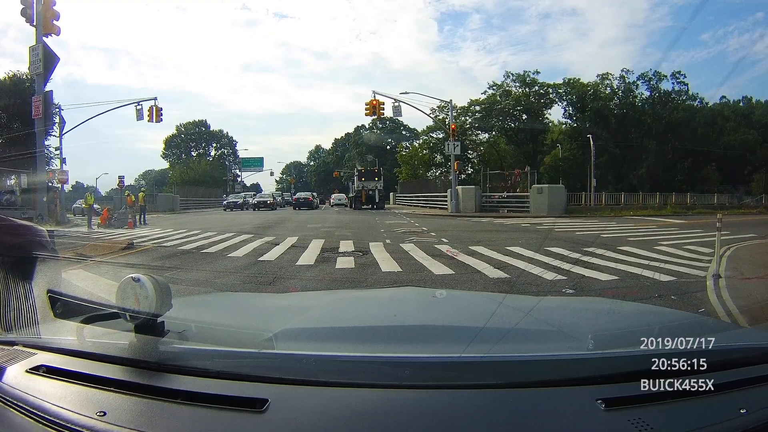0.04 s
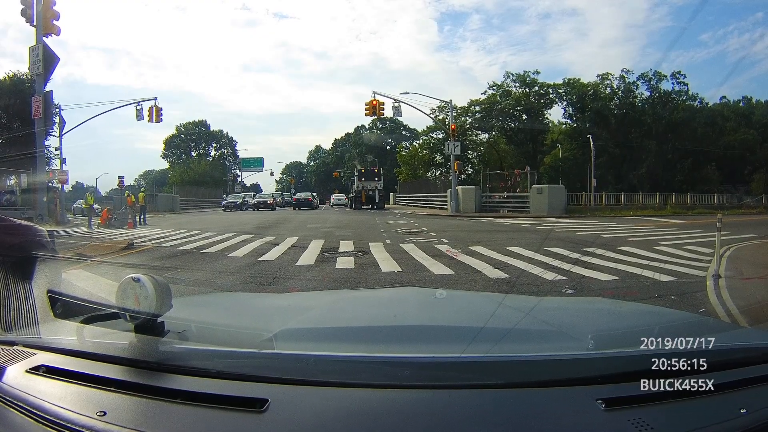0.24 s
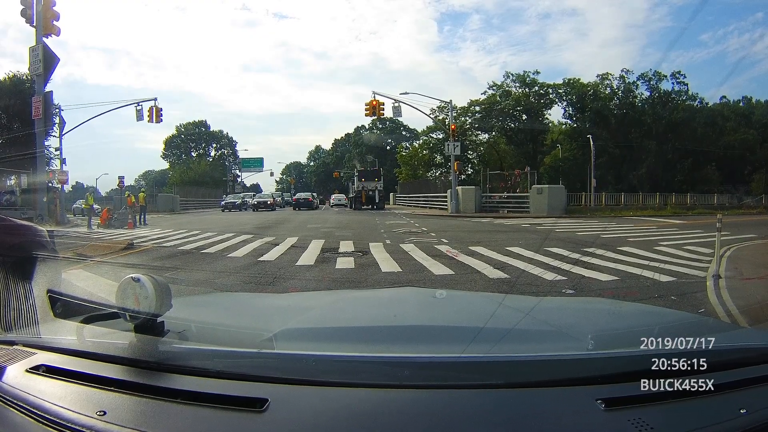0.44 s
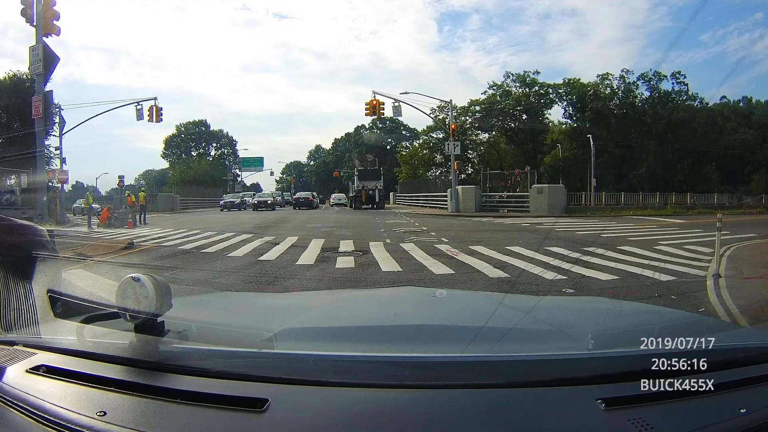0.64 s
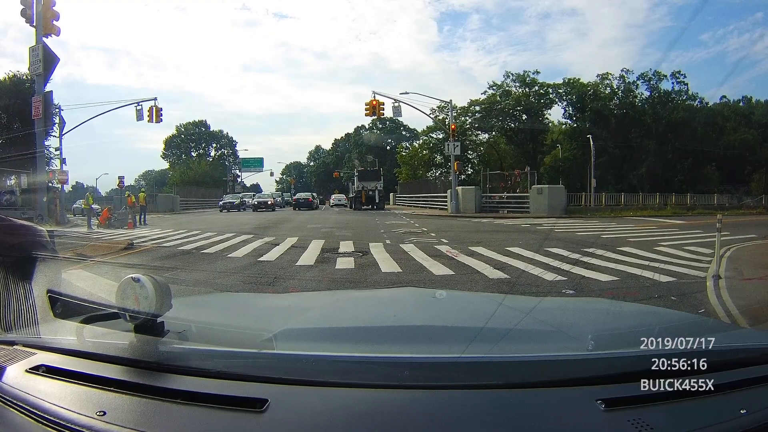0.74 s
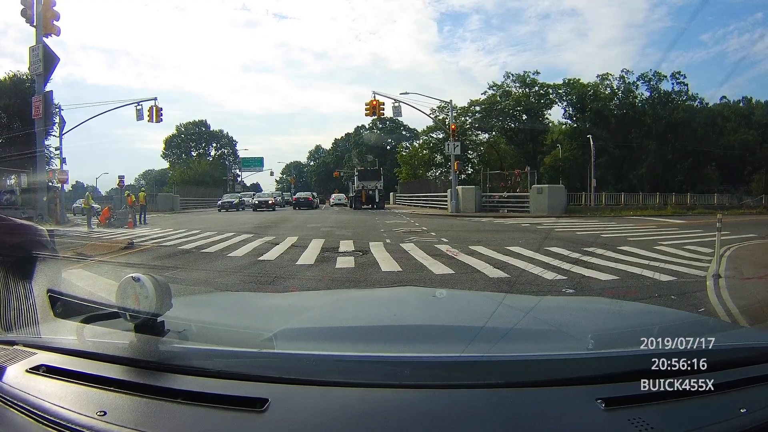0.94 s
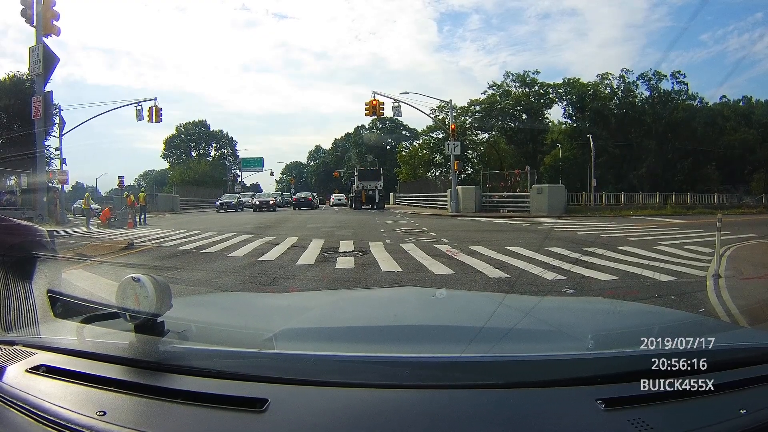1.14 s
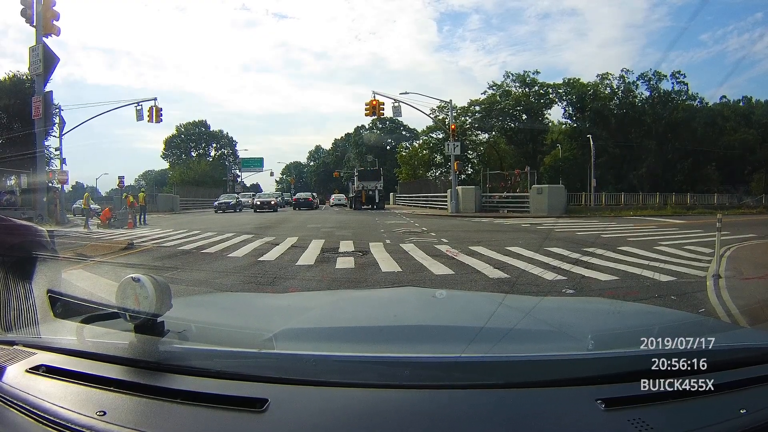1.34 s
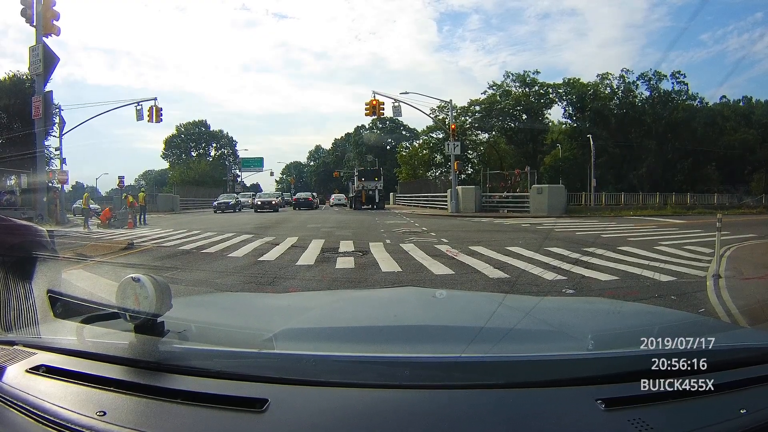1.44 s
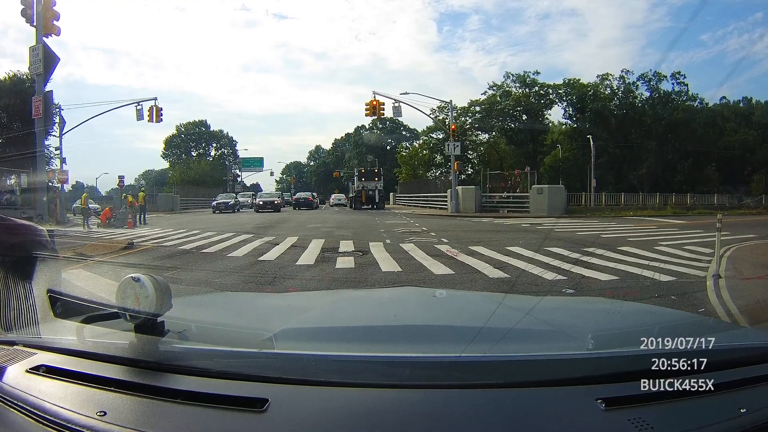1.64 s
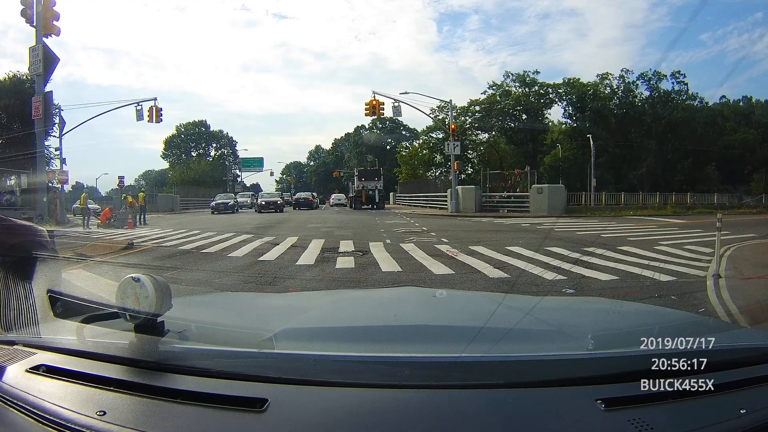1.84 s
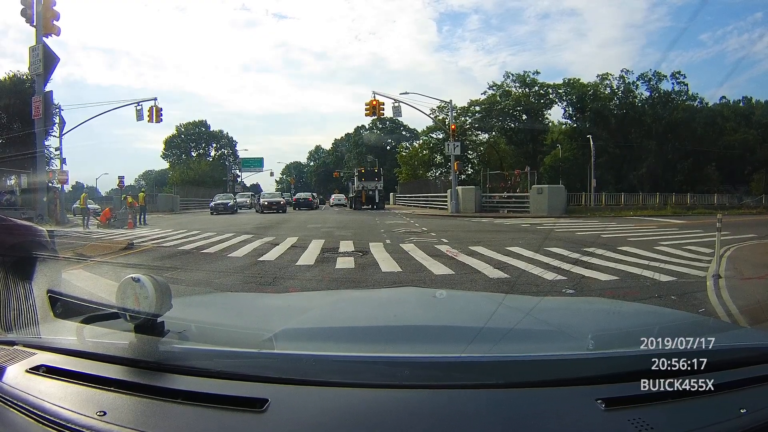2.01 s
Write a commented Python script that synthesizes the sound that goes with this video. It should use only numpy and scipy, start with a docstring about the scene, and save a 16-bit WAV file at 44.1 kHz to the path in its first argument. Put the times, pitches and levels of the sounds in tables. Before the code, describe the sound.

A big V8 engine idles from 0 to about 2.1 seconds, heard in mono inside a stationary car. A deep boom dominates, pulsing unevenly and wavering in pitch several times a second. The idle sags slightly around 0.55, recovers by 1.15 and dips again near 1.6. Muffled thuds swell near 1.2 and 1.85; soft knocks, fan air, grainy hiss, faint trim buzz and thin whines stay underneath.

```python
"""A big V8 idles with an uneven lope, heard from inside the cabin: a bending exhaust boom leads.
The cylinders of the two banks fire with uneven strength, so mostly odd multiples of the engine cycle drone.
Firing pulses thud through pipe and cabin resonances; decaying puffs of noise ring the engine as clatter.
Shaped noise makes the fan and a hiss that swells with each revolution; narrow bands of noise make loose
trim buzz, rattle and sizzle, and swell briefly at set pitches; faint whines from sine waves lie on top."""
import sys
import numpy as np
from scipy import signal
from scipy.fft import rfft, irfft
from scipy.io import wavfile
from scipy.ndimage import uniform_filter1d

SR = 44100
rng = np.random.default_rng(int(sys.argv[2]) if len(sys.argv) > 2 else 0)


def store_wav(level_fs):
    """Save 16-bit WAV to argv[1]."""
    pcm = np.round(np.clip(np.atleast_2d(level_fs), -1, 1) * 32767)
    wavfile.write(sys.argv[1], SR, pcm.T.astype(np.int16))


N = 91463
TIME = np.arange(N) / SR


def amp(db):
    """Decibels to gain."""
    return 10 ** (np.asarray(db) / 20)


def unit(x):
    """Scales to rms 1."""
    return x / np.sqrt(np.mean(x ** 2) + 1e-20)


def sine(hz):
    """A sine of peak 1 that follows a frequency curve."""
    return np.sin(2 * np.pi * np.cumsum(hz) / SR)


def drift(hz):
    """Random wander of rms 1, with little movement faster than hz times a second."""
    f = np.fft.rfftfreq(2 * N, 1 / SR)
    spectrum = rfft(rng.standard_normal(2 * N)) / (1 + (f / hz) ** 8)
    return unit(irfft(spectrum)[:N])


def noise(points, low_hz):
    """Noise of a given spectrum and rms 1, cut steeply below low_hz."""
    f = np.fft.rfftfreq(N, 1 / SR) + 1  # the offset keeps the logarithm finite
    hz, db = np.transpose(points)
    gain = amp(np.interp(np.log(f), np.log(hz), db))
    gain = gain / np.sqrt(1 + (low_hz / f) ** 8)
    return unit(irfft(rfft(rng.standard_normal(N)) * gain, N))


def ring(x, modes):
    """Passes x through parallel resonances, each filtered twice for steep sides, to rms 1."""
    out = np.zeros(N)
    for hz, half_width_hz, db in modes:
        b, a = signal.iirpeak(hz, hz / (2 * half_width_hz), SR)
        once = signal.lfilter(b, a, x)
        out += amp(db) * unit(signal.lfilter(b, a, once))
    return unit(out)


def beats(turns):
    """Samples at which a new whole turn begins."""
    return np.flatnonzero(np.diff(np.floor(turns), prepend=-1))


def burst(start, rise_s):
    """An envelope that peaks at 1, rise_s after its start, and dies away."""
    u = np.maximum(TIME - start, 0) / rise_s
    return u * np.exp(1 - u)


# Idle speed of the crankshaft. Each row: time in seconds, speed in rpm.
IDLE_SPEED = [(0, 535), (.3, 530), (.55, 485), (.85, 500), (1.15, 545), (1.35, 535), (1.6, 505), (1.9, 535),
              (2.07, 540)]
LOPE_LAG_TURNS = 0.14


def crankshaft():
    """Integrates idle speed into four-stroke cycles (two turns each) and a lope of one swing a turn."""
    rpm = np.interp(TIME, *np.transpose(IDLE_SPEED))
    revolutions = np.cumsum(rpm) / 60 / SR
    lope = np.cos(2 * np.pi * (revolutions - LOPE_LAG_TURNS))
    return revolutions / 2, lope


# Swells and bends of the exhaust boom, joined up and then smoothed.
# Each row: time in seconds, rms level in dB, pitch in Hz.
BOOM_PATH = [(0, -21.5, 74.2), (0.115, -16.5, 87.3), (0.184, -21, 81.55), (0.261, -12.5, 82.8),
             (0.303, -23, 79.76), (0.382, -19.5, 73.9), (0.478, -11.5, 86), (0.552, -23, 71.64),
             (0.609, -12.5, 80.05), (0.662, -25, 84.3), (0.695, -15.5, 78.8), (0.725, -30.5, 90.7),
             (0.758, -12.0, 77.28), (0.895, -16, 82.55), (0.957, -18, 67.7), (0.977, -12, 79.95),
             (1.056, -19.5, 77.5), (1.082, -23.5, 55.1), (1.11, -13.5, 85.6), (1.267, -39, 86.73),
             (1.3, -11.5, 82.55), (1.387, -15, 80.54), (1.411, -34.5, 59.43), (1.444, -11.0, 80.34),
             (1.485, -34.5, 92.1), (1.526, -15.5, 83.2), (1.617, -20.5, 72.03), (1.657, -13.0, 76.12),
             (1.705, -41.5, 72.16), (1.729, -13.5, 82.56), (1.753, -38.5, 92.8), (1.789, -12.0, 76.8),
             (1.817, -21, 92), (1.86, -14.5, 82.4), (1.935, -56.5, 86.96), (1.985, -12, 80.66),
             (2.02, -10.5, 79.5), (2.07, -38.5, 85.2)]
BOOM_GLIDE_S = .008


def boom():
    """The exhaust tone on the cabin resonance: its loudness and its pitch, sample by sample."""
    s, db, hz = np.transpose(BOOM_PATH)
    path = np.array([np.interp(TIME, s, amp(db)), np.interp(TIME, s, hz)])
    return uniform_filter1d(path, round(BOOM_GLIDE_S * SR))


# Deep exhaust tones. Each row: multiple of the four-stroke cycle, rms level in dB before wander and lope.
DRONE_TONES = [(9, -54), (11, -26.5), (13, -48.5), (25, -44.5), (32, -47), (39, -50.5), (70, -57)]
# Spectrum of the body shake under the tones. Each row: frequency in Hz, relative level in dB per Hz.
RUMBLE_SPECTRUM = [(28, 0), (40, 0), (70, -2), (110, -6), (200, -24), (600, -60)]
RUMBLE_DB, DRONE_LOPE_DB = -36.5, 4  # rumble level before the lope; lope swing either way


def exhaust(cycles, boom_gain, boom_hz, lope):
    """A clean, bending boom over cycle-locked deep tones and rumble that throb once a revolution."""
    drone = np.zeros(N)
    for order, db in DRONE_TONES:
        level = amp(db + .7 * drift(4))
        drone += level * np.cos(2 * np.pi * (order * cycles + .03 * drift(4)))
    rumble = amp(RUMBLE_DB) * noise(RUMBLE_SPECTRUM, 26)
    throb = (np.sqrt(2) * drone + rumble) * amp(DRONE_LOPE_DB * lope)
    return np.sqrt(2) * boom_gain * sine(boom_hz) + throb


SWELL_S = 0.053  # from the middle to 1/e of the change in dB


def swells(rows):
    """A level in dB that rises or dips smoothly around each listed moment."""
    return sum(db * np.exp(-((TIME - middle) / SWELL_S) ** 2) for middle, db in rows)


# Pulse strength of the cylinders in firing order. Each entry: relative level in dB before chance.
CYLINDER_STRENGTH = [-20, 7, -16, 0, -5, 12, 6.5, 7.5]
# Cabin and pipe resonances rung by the pulses.
# Each row: frequency in Hz, half width of one filter pass in Hz, relative level in dB.
CABIN_MODES = [(135, 20, 2), (163.8, 14, -1.5), (231, 31.3, -1), (293, 14, -4), (339.4, 39, -16)]
# Broad rises and dips in the level of the low-mid thudding.
# Each row: middle in seconds, level change in dB.
THUD_SWELLS = [(.17, -0.5), (.42, 1.5), (1.21, 6.5), (1.85, 4)]
UNEVEN_DB = 4  # scales the chance in each pulse
THUD_DB, THUD_LOW_CUT_HZ = -43, 123  # rms level before the low cut and the swells


def firing(cycles):
    """Eight pulses a cycle, uneven in strength and mixed with noise, thud through pipe and cabin."""
    at, pulses = beats(len(CYLINDER_STRENGTH) * cycles), np.zeros(N)
    chance_db = UNEVEN_DB * rng.uniform(-2.0, 1, len(at))
    pulses[at] = amp(np.resize(CYLINDER_STRENGTH, len(at)) + chance_db)
    rough = unit(pulses) + 1.66 * rng.standard_normal(N)
    low_cut = signal.butter(2, THUD_LOW_CUT_HZ, "high", fs=SR, output="sos")
    thuds = signal.sosfilt(low_cut, ring(rough, CABIN_MODES))
    return amp(THUD_DB) * thuds * amp(swells(THUD_SWELLS))


# Engine resonances in the clatter.
# Each row: frequency in Hz, half width of one filter pass in Hz, relative level in dB.
CLATTER_MODES = [(651, 59, 13.5), (705.4, 17, -4)]
CLATTER_DB, CLATTER_LOPE_DB, CLATTER_UNEVEN_DB = -47.5, 4.5, 1
PUFF_DECAY_S = 0.0043
# Harder knocks. Each row: start in seconds, peak level in dB before the knock trim.
HARD_KNOCKS = [(.106, -30), (.136, -30), (.222, -29), (.247, -27.5), (.356, -30), (.479, -26), (.836, -24),
               (.957, -29), (1.179, -31), (1.288, -29.5), (1.375, -31), (1.524, -29), (1.646, -28.5),
               (1.734, -28), (1.858, -28.5), (1.975, -28.5)]
KNOCK_TRIM_DB, KNOCK_HZ, KNOCK_RISE_S = -5.5, 648, .004


def clatter(cycles, lope):
    """Two valve strokes per firing puff noise into the engine's resonances; wavering sines knock on top."""
    at, pulses = beats(2 * len(CYLINDER_STRENGTH) * cycles), np.zeros(N)
    pulses[at] = amp(CLATTER_UNEVEN_DB * rng.uniform(-1, 1, len(at)))
    decay = np.exp(-1 / (PUFF_DECAY_S * SR))
    puffs = signal.lfilter([1], [1, -decay], pulses) * rng.standard_normal(N)
    strokes = unit(ring(puffs, CLATTER_MODES) * amp(CLATTER_LOPE_DB * lope))
    knock_tone = sine(KNOCK_HZ * (1 + 0.0478 * drift(85)))
    knocks = sum(amp(db + KNOCK_TRIM_DB) * burst(start, KNOCK_RISE_S) for start, db in HARD_KNOCKS)
    return amp(CLATTER_DB) * strokes + knock_tone * knocks


# Fan and air spectrum. Each row: frequency in Hz, relative level in dB per Hz before the low cut.
AIR_SPECTRUM = [(120, -36), (200, 2.5), (258, -30), (309, -2), (459, -11), (636, -1.5), (804, -9.5),
                (1040, -10.5), (2060, -22), (2420, -21.5), (6300, -37.5), (8120, -32.5), (8570, -34.5),
                (9720, -39), (15000, -38)]
AIR_DB, AIR_LOPE_DB, AIR_LOW_CUT_HZ = -44, 0.6, 182
# Hiss spectrum. Each row: frequency in Hz, relative level in dB per Hz before the low cut.
HISS_SPECTRUM = [(1200, -1), (2000, -8), (2400, 11), (3200, -0.5), (4300, -0.5), (5400, 6), (6200, 3.5),
                 (7200, 7.5), (8200, -11.5), (9100, -5), (9850, 3), (11000, -8), (13000, -4.5),
                 (15000, -11)]
# Broad surges of the hiss. Each row: middle in seconds, level change in dB.
HISS_SURGES = [(.01, 3.5), (.26, 3.5), (.83, 4.5), (1.69, 5.5)]
HISS_DB, HISS_LOPE_DB, HISS_GRAIN_DB = -58.5, 1.5, 2
HISS_FOLLOW = 0.19  # dB of hiss per dB of boom


def air(lope, shake_db):
    """Nearly steady fan noise, and a grainy hiss that follows lope and boom and now and then surges."""
    fan = unit(noise(AIR_SPECTRUM, AIR_LOW_CUT_HZ) * amp(AIR_LOPE_DB * lope))
    hiss = noise(HISS_SPECTRUM, 1400)
    swell_db = HISS_LOPE_DB * lope + HISS_FOLLOW * shake_db + swells(HISS_SURGES)
    hiss = hiss * amp(swell_db + HISS_GRAIN_DB * drift(270))
    return amp(AIR_DB) * fan + amp(HISS_DB) * unit(hiss)


BUZZ_HZ, BUZZ_HALF_WIDTH_HZ, BUZZ_DB = 5620, 75, -69.5
BUZZ_FOLLOW = .8  # dB of buzz per dB of boom
RATTLE_HZ, RATTLE_DB, RATTLE_LOPE_DB = 9630, -69.5, 0.5
# Brief sizzles. Each row: start in seconds, level in dB before the sizzle trim, centre in Hz.
TRIM_SIZZLES = [(.116, -59, 9850), (.331, -57.5, 4300), (.69, -59, 4200), (.704, -60, 9600),
                (.82, -59, 9850), (1.042, -56, 4470), (1.058, -60, 9300), (1.165, -57.5, 9700),
                (1.493, -60, 9900), (1.852, -60, 9800)]
SIZZLE_TRIM_DB, SIZZLE_RISE_S = -1.0, .008
GRAIN_HALF_WIDTH_HZ = 800  # of one filter pass, for rattle and sizzles
# Brief swells of narrow noise, one at the pitch of a whine, the others near the buzz.
# Each row: middle in seconds, level in dB, centre in Hz.
NARROW_SWELLS = [(.5, -55, 1455), (.8, -59, 5620), (.865, -62, 5390), (1.462, -60.5, 5620)]
NARROW_SWELL_S, NARROW_HALF_WIDTH_SHARE = .026, .018  # middle to 1/e; share of the centre frequency


def trim_and_narrow_swells(lope, shake_db):
    """Loose trim as narrow noise: buzz follows boom, rattle follows lope; sizzles and swells are placed."""
    buzz = ring(rng.standard_normal(N), [(BUZZ_HZ, BUZZ_HALF_WIDTH_HZ, 0)])
    out = amp(BUZZ_DB) * unit(buzz * amp(BUZZ_FOLLOW * shake_db))
    grains = rng.standard_normal(N) * amp(2 * drift(610))
    rattle = ring(grains, [(RATTLE_HZ, GRAIN_HALF_WIDTH_HZ, 0)])
    out += amp(RATTLE_DB) * unit(rattle * amp(RATTLE_LOPE_DB * lope))
    for start, db, hz in TRIM_SIZZLES:
        sizzle = ring(grains, [(hz, GRAIN_HALF_WIDTH_HZ, 0)])
        out += amp(db + SIZZLE_TRIM_DB) * burst(start, SIZZLE_RISE_S) * sizzle
    for middle, db, hz in NARROW_SWELLS:
        envelope = np.exp(-((TIME - middle) / NARROW_SWELL_S) ** 2)
        out += amp(db) * envelope * ring(grains, [(hz, hz * NARROW_HALF_WIDTH_SHARE, 0)])
    return out


# Accessory whines. Each row: centre in Hz, rms level in dB before wander, rms pitch waver in Hz.
ACCESSORY_WHINES = [(1045, -58, 2), (1454, -68, 6), (1533, -68.5, 2), (2346, -77, 8), (522, -62, 4)]
ELECTRIC_HZ, ELECTRIC_DB = 7880, -63.5  # rms level


def whines():
    """Sines wavering in pitch and level for the accessories, and one pure electrical tone."""
    out = amp(ELECTRIC_DB) * np.sin(2 * np.pi * ELECTRIC_HZ * TIME)
    for hz, db, waver_hz in ACCESSORY_WHINES:
        level = amp(db + 2 * drift(4.4))
        out += level * sine(hz + waver_hz * drift(10.6))
    return np.sqrt(2) * out


SHAKE_S = 0.013  # smoothing of the boom level that shakes hiss and buzz


def scene():
    """One crankshaft times the engine and the lope; the boom level shakes hiss and buzz."""
    cycles, lope = crankshaft()
    boom_gain, boom_hz = boom()
    shake = uniform_filter1d(boom_gain, round(SHAKE_S * SR)) / boom_gain.mean()
    shake_db = 20 * np.log10(shake)
    engine = exhaust(cycles, boom_gain, boom_hz, lope) + firing(cycles) + clatter(cycles, lope)
    cabin = air(lope, shake_db) + trim_and_narrow_swells(lope, shake_db) + whines()
    return (engine + cabin)[None]


FADE_S, TOP_HZ = .0015, 15200


def record(dry):
    """Fades both ends softly and rolls off the treble above TOP_HZ with a steep linear-phase filter."""
    to_edge_s = np.minimum(TIME, TIME[::-1])
    ends = np.sin(np.pi / 2 * np.minimum(to_edge_s / FADE_S, 1)) ** 2
    low_pass = signal.firwin(511, TOP_HZ, window=("kaiser", 9), fs=SR)
    return signal.oaconvolve(dry * ends, low_pass[None], "same")


dry = scene()
out = record(dry)
store_wav(out)
```